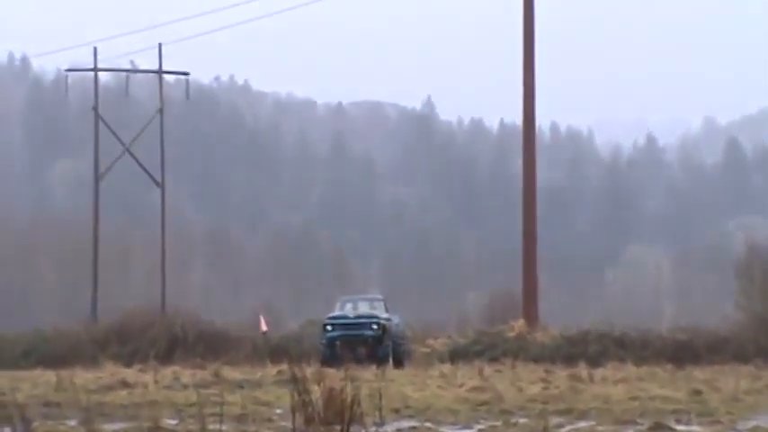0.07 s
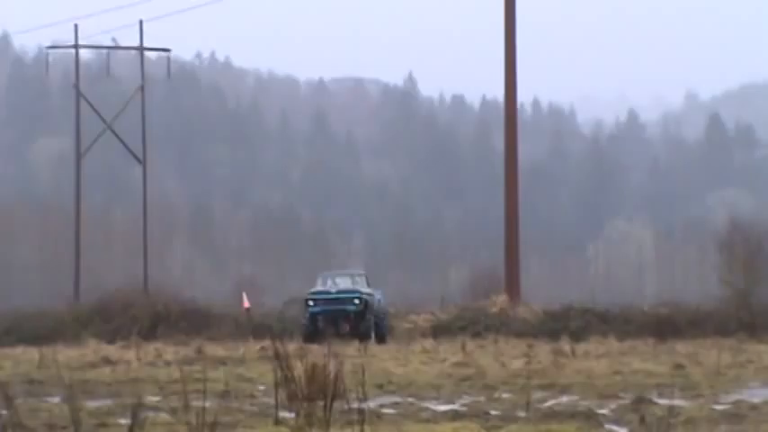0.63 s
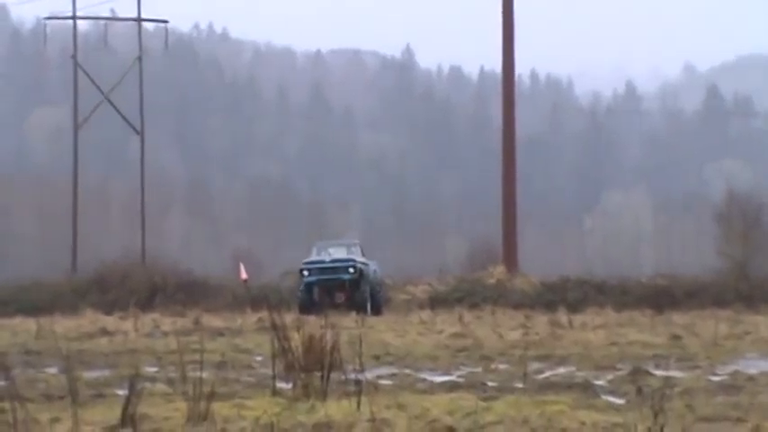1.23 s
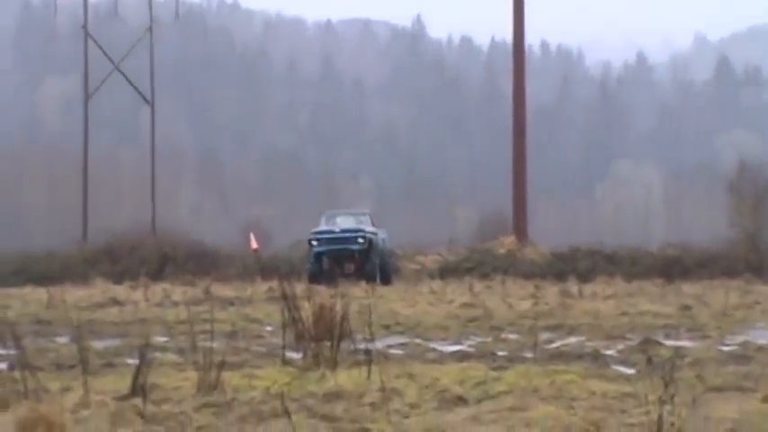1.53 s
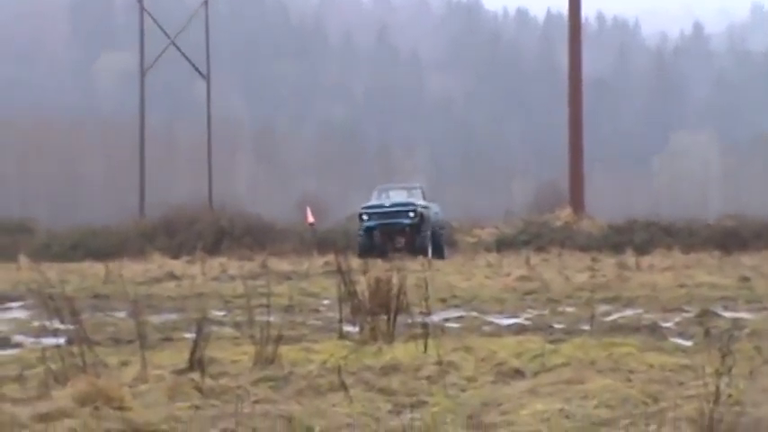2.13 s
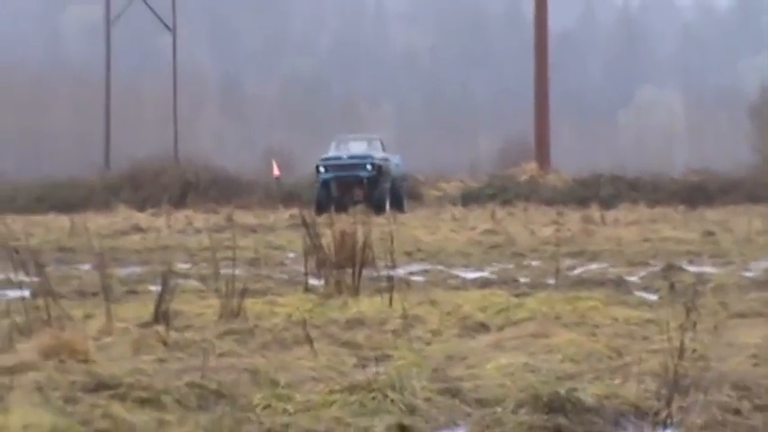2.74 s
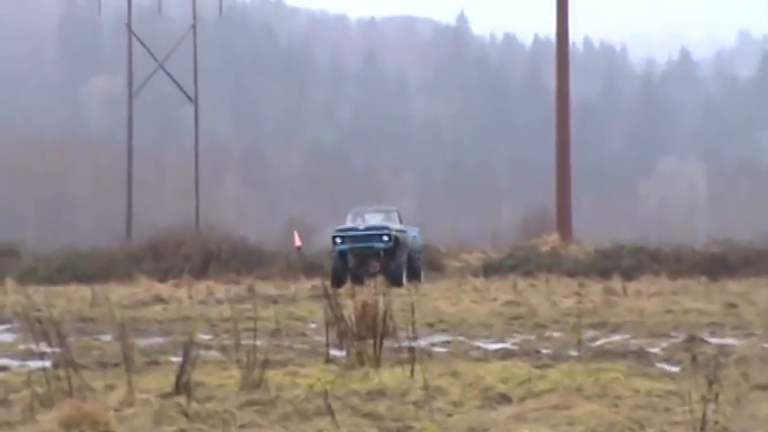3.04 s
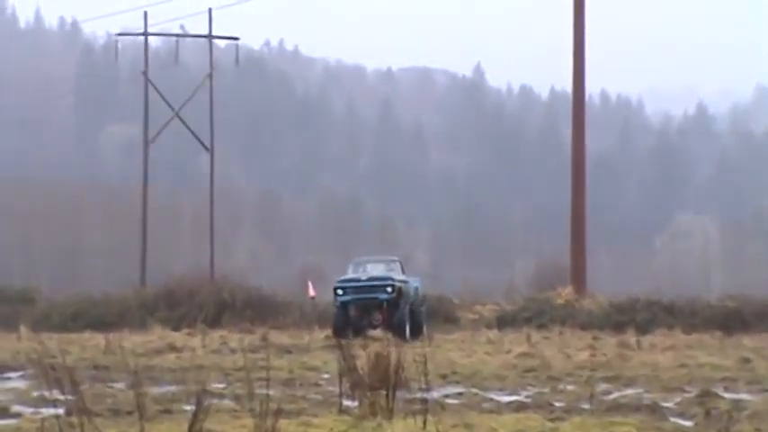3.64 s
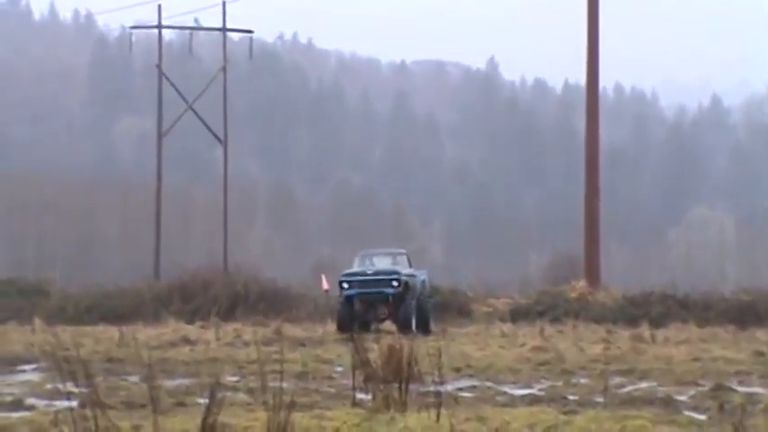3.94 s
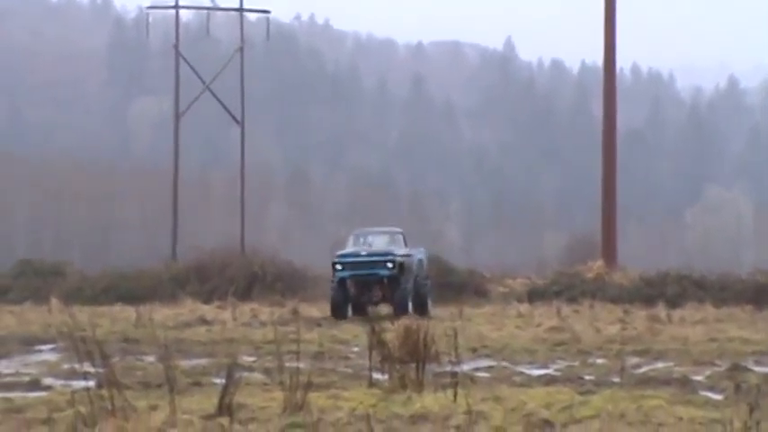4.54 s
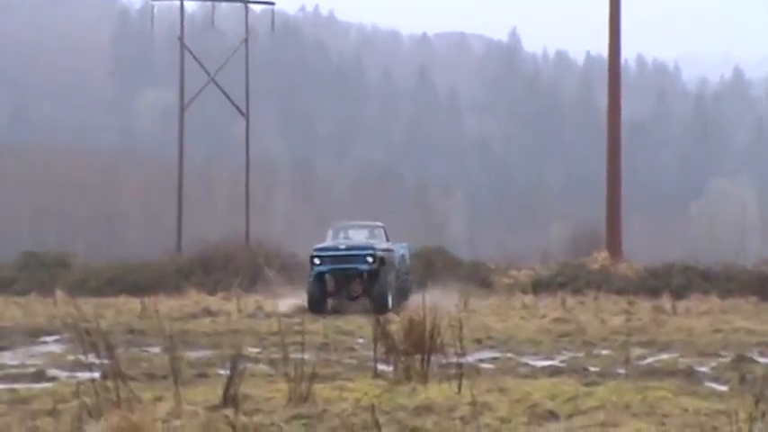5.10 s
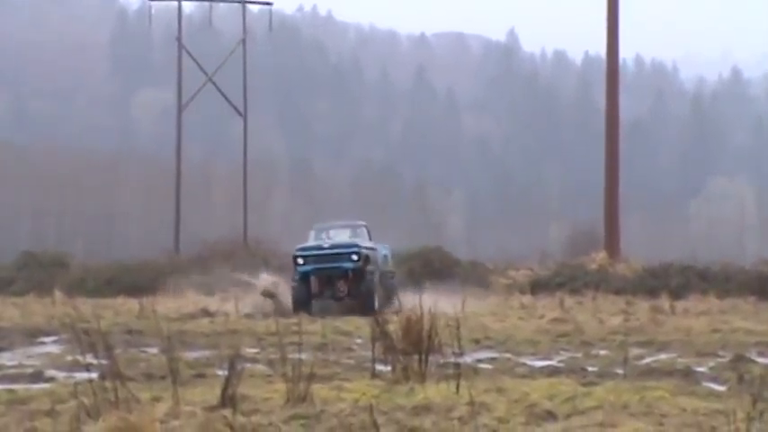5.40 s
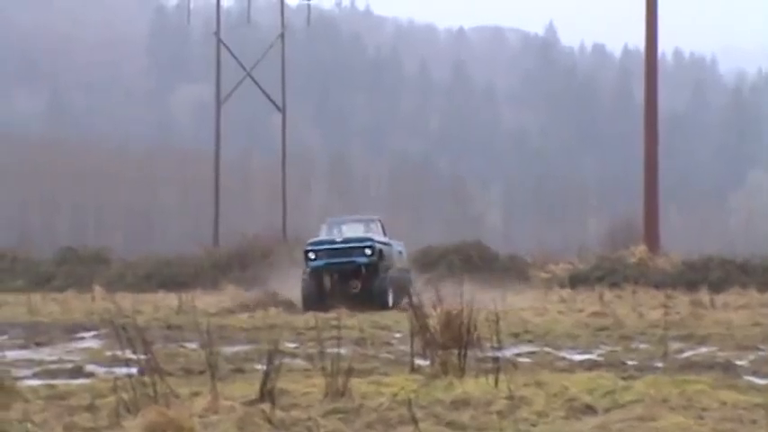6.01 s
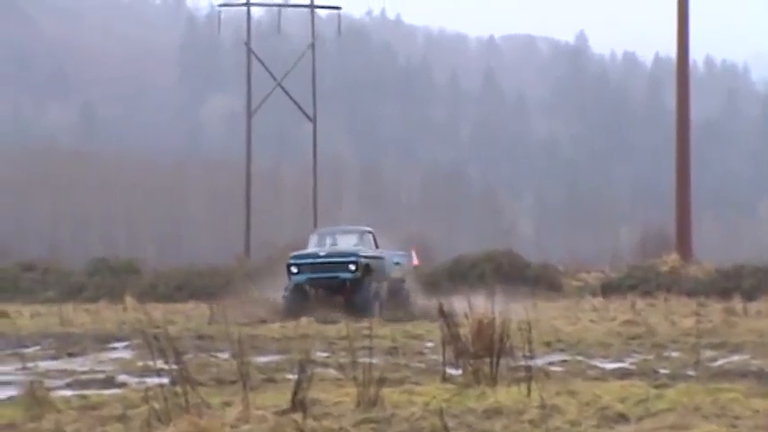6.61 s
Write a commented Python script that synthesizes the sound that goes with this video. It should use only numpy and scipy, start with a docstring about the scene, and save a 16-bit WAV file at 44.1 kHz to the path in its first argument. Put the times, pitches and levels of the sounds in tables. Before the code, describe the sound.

Across a flooded field, with a soft breeze buffeting the microphone, a truck's open exhaust chugs unevenly. Loose steel sings and clanks briefly as it starts moving over wet grass, and a few bright ticks snap close by. Then the revs climb steeply into a louder, ragged roar with a hiss of wheelspin. Sheets of water spray up one after another as the truck draws nearer at full throttle, its tread humming.

```python
"""A V8 mud truck idles far off across a flooded field, its open exhaust loping, while a light wind
stirs on the microphone. After a second it rolls off through wet grass: loose steel sings and clanks,
and a few bright ticks snap. Then it revs up, the exhaust booming and rasping under load as the spinning
tyres scrub the turf. From about four seconds it charges through standing water, throwing up sheets of
spray, and the hum of the tread climbs as the engine is held flat out."""
import sys
import numpy as np
from scipy import signal
from scipy.fft import rfft, irfft, next_fast_len
from scipy.io import wavfile
from scipy.ndimage import uniform_filter1d, map_coordinates

SR = 44100
rng = np.random.default_rng(int(sys.argv[2]) if len(sys.argv) > 2 else 0)


def persist_wave(psi):
    """Save psi, clipped to +-1, as 16-bit WAV."""
    counts = np.round(np.clip(psi, -1, 1) * 32767).astype(np.int16)
    wavfile.write(sys.argv[1], SR, np.atleast_2d(counts).T)


N = 298116

# How hard the engine pulls. Each row: time in seconds, load from 0 to 1.
ENGINE_LOAD = [(0, 0), (2.2, 0.2), (2.8, 0.96), (6.76, 0.86)]


def amp(db):
    """Decibels to gain."""
    return 10 ** (np.asarray(db) / 20)


def unit(x):
    """Scale to rms 1."""
    return x / np.sqrt(np.mean(x ** 2) + 1e-20)


def along(points, hz):
    """Read (Hz, value) points on a log frequency axis."""
    freqs, values = np.transpose(points)
    return np.interp(np.log(hz + 1), np.log(freqs + 1), values)


def curves(rows):
    """Automation: one value per sample for each column after the time."""
    times, *columns = np.transpose(rows)
    return [np.interp(np.arange(N) / SR, times, column) for column in columns]


def wobble(rate):
    """A smooth random curve, rate knots a second."""
    knots = rng.standard_normal(4096)
    coarse = np.arange(0, N + 64, 64)
    return np.interp(np.arange(N), coarse, map_coordinates(knots, [coarse * rate / SR], mode="wrap"))


def filtered(x, response):
    """x through a complex frequency response."""
    size = next_fast_len(N + SR // 2)
    return irfft(rfft(x, size) * response(np.fft.rfftfreq(size, 1 / SR)), size)[..., :N]


def coloured(x, spectrum):
    """x through a (Hz, dB) EQ curve, at rms 1."""
    return unit(filtered(x, lambda hz: amp(along(spectrum, hz))))


def wind():
    """Each microphone port is buffeted on its own, over the faint hiss of open air."""
    # Gusts. Each row: time in seconds, relative level in dB.
    gusts = [(0, -32), (.5, -35.5), (1.1, -30.5), (1.6, -33), (2.3, -31), (2.7, -27), (3.1, -30),
             (3.5, -37.5), (3.95, -30), (4.5, -36), (6.76, -46.5)]
    # Tone of the air and of the buffeting. Each row: frequency in Hz, gain in dB.
    air_eq = [(100, 10), (400, -4.5), (800, 8.5), (1400, -1.5), (3000, -8), (6000, -14), (7500, -21),
              (10500, -27), (15500, -31)]
    rumble_eq = [(10, -21), (25, -4.5), (45, -0.5), (80, 4.0), (150, -43), (400, -34.5), (1500, -84)]
    lumps = amp(1.5 * np.array([wobble(9), wobble(9)]))
    rumble = coloured(lumps * rng.standard_normal((2, N)), rumble_eq)
    hiss = coloured(rng.standard_normal((2, N)), air_eq)
    return amp(curves(gusts)[0] + 3.5) * rumble + amp(-44) * hiss


def crackle():
    """A fine, dry crackle close by: dense tiny grains, partly different at each port."""
    # The crackle's fader. Each row: time in seconds, level in dB.
    fader = [(0, -63.5), (.6, -55.5), (1.0, -60.5), (1.6, -59), (2.05, -71), (2.3, -69), (2.6, -60.5),
             (3.1, -52), (3.4, -71), (6.76, -66)]
    # Its fizzy tone. Each row: frequency in Hz, gain in dB.
    fizz_eq = [(3000, -9), (5200, 3.5), (6000, -7), (7200, -10), (10500, -4), (13000, -7), (15500, -17)]
    grains = rng.standard_normal((3, N)) * amp(3 * wobble(500) + wobble(25))
    return amp(curves(fader)[0]) * coloured(grains[0] + 0.3 * grains[1:], fizz_eq)


def ticks():
    """Small sharp ticks, each a snap of bright band-passed noise."""
    # Each row: start in seconds, relative peak in dB, band centre in Hz.
    cues = [(1.695, -30, 9400), (1.7498, -20, 9200), (1.7584, -43, 7500), (2.2383, -33, 9700),
            (2.2523, -28, 9280), (2.2674, -33, 11000), (2.3136, -30, 10300)]
    out, t = np.zeros(N), np.arange(SR // 20) / SR
    for start, db, hz in cues:
        snap = rng.standard_normal(len(t)) * amp(-60 * t / 0.019) * (1 - np.exp(-t / .0015))
        octaves = np.log2((np.fft.rfftfreq(len(t), 1 / SR) + 1) / hz)
        snap = irfft(rfft(snap) * np.exp(-(octaves / 0.62) ** 2), len(t))
        out[round(start * SR):][:len(t)] += amp(db - 6.5) * snap / np.abs(snap).max()
    return out


def field_reverb(x):
    """The field and tree line answer with a diffuse tail that differs from side to side."""
    # Each row: frequency in Hz, seconds to fall 60 dB.
    decay_times = [(100, 1), (1500, 0.17), (10000, 0.053)]
    hz, t, noise = signal.stft(rng.standard_normal((2, SR // 2)), SR, nperseg=256)
    tail = signal.istft(noise * amp(-60 * t / along(decay_times, hz)[:, None]), SR, nperseg=256)[1]
    return signal.fftconvolve(x[None], tail / np.linalg.norm(tail[0]), axes=1)[:, :N]


def panned(x):
    """The two ports hear the truck at different levels and phases."""
    # Each row: frequency in Hz, left minus right in dB.
    balance = [(60, 6.5), (110, 3.5), (200, 7.5), (380, 1), (700, -2.5), (1290, -6), (2380, -1.5),
               (4400, 0.5), (15000, 1)]
    # Each row: frequency in Hz, phase lead of the left in radians.
    lead = [(60, -1.14), (200, -0.39), (340, -1.06), (700, -0.65), (1500, -0.15), (3500, 0.4), (6000, 0.31)]

    def ports(hz):
        side = np.array([[1], [-1]])
        pair = amp(along(balance, hz) * side / 2) * np.exp(.5j * side * along(lead, hz))
        return pair / np.abs(pair.mean(axis=0))
    return filtered(x, ports)


def chassis(squeal_hz, width_hz):
    """Loose steel sings and clanks as the truck rolls off over the ruts."""
    # The thin metallic singing. Each row: time in seconds, level in dB.
    squeal_fader = [(1.0, -75), (1.25, -43.5), (1.48, -36.5), (1.56, -40), (1.67, -40.5), (1.85, -42.5),
                    (2.2, -70)]
    # Each row: start in seconds, relative level in dB.
    clanks = [(1.48, -28.5), (2.088, -19), (2.309, -33)]
    # The ring of the steel. Each row: frequency in Hz, gain in dB, seconds to fall 60 dB.
    modes = [(2210, -14, .08), (2420, 2, 0.043), (2800, -7, .1), (3630, -8, 0.067), (3970, -8, 0.054),
             (5840, -4, 0.017)]

    def resonances(hz):
        return sum(amp(db) / (1 + ((hz - squeal_hz * ratio) / width_hz) ** 2)
                   for ratio, db in [(.73, -5), (1, 2), (1.19, -12)])
    squeal = unit(filtered(rng.standard_normal(N), resonances))
    out = amp(curves(squeal_fader)[0] + 1.8 * wobble(35)) * squeal
    t = np.arange(SR // 4) / SR
    for start, db in clanks:
        ring = sum(amp(level + rng.normal(0, 1.2) - 60 * t / t60) * np.sin(2 * np.pi * hz * t)
                   for hz, level, t60 in modes)
        out[round(start * SR):][:len(t)] += amp(db) * ring * (1 - np.exp(-t / 0.0003))
    return out


def tyres():
    """Tread blocks slap the ground in a rising hum; wheelspin adds a scrubbing hiss."""
    # The hum. Each row: time in seconds, pitch in Hz, level in dB.
    tread = [(0, 49.9, -94), (5.2, 58.04, -49), (5.5, 67.5, -30.5), (5.9, 81.2, -36.5), (6.3, 86.8, -36),
             (6.76, 103.2, -32)]
    # Wheelspin on turf, up to the water's edge. Each row: time in seconds, level in dB.
    scrub_fader = [(2.8, -54), (3.1, -44), (3.42, -39), (4.0, -33.5), (4.11, -55)]
    # Its tone. Each row: frequency in Hz, gain in dB.
    scrub_eq = [(2000, -46), (2800, 9.5), (3400, 11.5), (3900, -14), (4600, -28), (7000, -59)]
    hz, db = curves(tread)
    hum = amp(db + 0.78 * wobble(13)) * unit(np.sin(2 * np.pi * np.cumsum(hz) / SR))
    scrub = amp(curves(scrub_fader)[0] + wobble(24.86)) * coloured(rng.standard_normal(N), scrub_eq)
    return hum + scrub


def spray(fall_s):
    """Tyres swish through wet grass, then throw sheets of water that rise, hold and fall as drops."""
    # Wet grass. Each row: time in seconds, relative level in dB.
    grass_fader = [(0.0, -57), (0.15, -52.5), (0.74, -56), (1.2, -50.5), (1.57, -44), (1.87, -43),
                   (2.02, -39.5), (2.66, -46), (3.34, -45.5), (4.0, -40), (4.12, -43.5)]
    # One sheet per puddle. Each row: start, attack and length in seconds, level in dB.
    puddles = [(4.148, 0.18, 0.45, -31), (4.523, 0.075, 0.13, -29), (4.908, 0.047, 0.092, -29),
               (5.105, 0.063, 0.37, -27), (5.54, .06, 0.32, -28.5), (5.853, 0.074, 0.33, -27),
               (6.36, 0.055, .4, -31.5)]
    # Tone of the water under load and at idle. Each row: frequency in Hz, gain in dB.
    spray_eq = [(1650, -18.5), (2800, 2), (3300, 0.5), (3620, 2), (3980, 3), (4760, -8), (5490, -7.5),
                (6710, -13), (7570, -21.5), (10200, -26.5), (13100, -46), (15500, -64)]
    swish_eq = [(1650, -5), (2800, -7.5), (3320, -2), (3620, -7), (3840, 2), (4240, -7.5), (4720, -6.5),
                (5940, -8.5), (7200, -19.5), (9590, -20.5), (15500, -49)]
    t = np.arange(N) / SR
    power = amp(curves(grass_fader)[0] + 5) ** 2
    for start, attack, length, db in puddles:
        release = np.exp(-np.maximum(t - start - length, 0) / fall_s)
        sheet = np.clip((t - start) / attack, 0, 1) * release
        power += (amp(db) * sheet) ** 2
    load, = curves(ENGINE_LOAD)
    drops = unit(rng.standard_normal(N) * amp(1.46 * wobble(350) + 0.52 * wobble(30)))
    water = np.sqrt(load) * coloured(drops, spray_eq) + np.sqrt(1 - load) * coloured(drops, swish_eq)
    return np.sqrt(power) * water


def crank():
    """Four-stroke cycles per second, and cycles turned so far: eight firings each."""
    # Idle, a long climb, a stumble in the water, flat out. Each row: time in seconds, cycles a second.
    revs = [(0.0, 10.7), (0.3, 11.2), (0.79, 12.7), (1.13, 11.9), (1.45, 12.9), (1.81, 10.9), (2.11, 10.6),
            (2.43, 14.1), (2.56, 15.6), (2.79, 15.4), (2.92, 17.6), (3.07, 19.1), (3.22, 20.1),
            (3.41, 24.0), (3.56, 24.7), (3.75, 27.8), (3.9, 28.9), (4.05, 31.6), (4.52, 35.4), (4.67, 38.2),
            (4.86, 36.5), (5.03, 40.2), (5.12, 38.0), (5.31, 42.1), (5.67, 42.2), (5.78, 43.2),
            (6.23, 43.5), (6.76, 41.9)]
    rate, = curves(revs)
    return rate, np.cumsum(rate) / SR


def gas_bursts(scatter_db, decay_s):
    """One turbulent puff per firing, each of another size, held to an even average level."""
    rate, cycles = crank()
    firing, fraction = np.divmod(8 * cycles, 1)
    size = amp(scatter_db * rng.standard_normal(int(firing[-1]) + 1))[firing.astype(int)]
    age_s = fraction / (8 * rate)
    envelope = size * np.exp(-age_s / decay_s)
    running_rms = np.sqrt(np.abs(uniform_filter1d(envelope ** 2, size=SR // 4)) + 1e-9)
    return rng.standard_normal(N) * envelope / running_rms


def snarl(spread_db):
    """A crackle that repeats with every engine cycle, so that its high orders glide with the crank."""
    size, order_count = 8192, 220
    levels, phases = rng.standard_normal((2, order_count))
    loop = irfft(np.r_[0, amp(spread_db * levels) * np.exp(2j * np.pi * phases)], size)
    rate, cycles = crank()
    wave = np.interp(cycles % 1 * size, np.arange(size), loop)
    # as strong per hertz as white noise of rms 1
    return unit(wave) * np.sqrt(order_count * rate / (SR / 2))


def exhaust_rasp(dip_hz, dip_width_hz):
    """The sharp front of each burst barks and rasps: loose at idle, mostly crank-locked under load."""
    # Tone of the midrange bark and the brighter rasp. Each row: frequency in Hz, gain in dB.
    bark_eq = [(250, -35.5), (450, 5), (560, -6), (690, 2.5), (830, -2), (980, 3.5), (1300, 4), (1550, -32),
               (1900, -23), (3000, -65)]
    rasp_eq = [(900, -46), (1400, 0), (1600, 2), (1740, 4.5), (1850, 7), (2020, 2), (2280, 5), (2480, 3.5),
               (2620, 5.5), (2780, -13), (3250, -6), (3900, -15), (6000, -76.5)]
    # The rasp hardens as the truck pulls and nears. Each row: time in seconds, relative level in dB.
    rasp_fader = [(0.0, -47.5), (1.04, -46.5), (1.3, -38.5), (2.45, -31), (2.65, -34.5), (3.37, -31),
                  (4.03, -25.5), (4.09, -30.5), (4.2, -25), (4.56, -26.5), (4.63, -23), (4.93, -23),
                  (5.01, -18), (5.03, -22.5), (5.21, -18.5), (5.31, -21.5), (6.29, -18), (6.76, -18.5)]
    # The ground bounce notches the bark. Each row: time in seconds, depth from 0 to 1.
    ground_dip = [(0, 0), (2.6, 0), (3.3, 0.98), (4.4, 0.35), (5.2, 0), (5.7, 0.32), (6.2, 0.83),
                  (6.76, 0.8)]
    bark_db = -35 + 10.5 * np.log2(crank()[0] / 28.25)  # 10.5 dB up per doubling of the revs
    rasp_db = curves(rasp_fader)[0] - 0.5
    # the snarl's pattern drifts as the truck moves
    drift = np.array([wobble(3.5) for _ in range(5)])
    pattern = sum(weight * snarl(spread_db=4) for weight in drift / np.linalg.norm(drift, axis=0))
    locked = np.interp(curves(ENGINE_LOAD)[0], [0, 1], [.15, .72])
    gas = np.sqrt(locked) * pattern + np.sqrt(1 - locked) * gas_bursts(scatter_db=1.5, decay_s=0.024)
    bark = coloured(gas, bark_eq)
    cancelled = filtered(bark, lambda hz: np.exp(-((hz - dip_hz) / dip_width_hz) ** 2))
    bark -= curves(ground_dip)[0] * cancelled
    flutter_db = .9 * wobble(32)
    return amp(bark_db + .5 * flutter_db) * bark + amp(rasp_db + flutter_db) * coloured(gas, rasp_eq)


def exhaust_boom():
    """Low orders of the crank through the pipe, over the throb of uneven combustion."""
    # The two banks fire unevenly. Each row: multiple of the cycle rate, gain in dB idling and loaded.
    orders = [(2, -2, 6), (3, 9.5, 12), (4, -1, 8), (6, 8, 5.5), (7, 5.5, 8), (9, -6, 11), (10, 10, 7),
              (11, 11, 1.5), (12, -23, -0.5), (13, 11, 2.5), (14, 10, -.5), (15, -11, -2), (16, 8, 1),
              (17, 5, -3.5), (18, 1, -3), (19, -16, -20), (20, -24, -22), (21, 0, -21), (22, -8.5, -13.5)]
    # Tone of the pipe and of the throb. Each row: frequency in Hz, gain in dB.
    pipe_eq = [(30, -30), (70, -16.5), (100, -12), (128, -11), (170, -3.5), (215, 0), (280, -10.5),
               (340, -5.5), (430, -8), (520, -27), (700, -22), (1000, -22)]
    throb_eq = [(20, -33), (60, -25), (120, -15), (180, 1), (260, -1.5), (360, -15), (500, -26),
                (800, -24.5), (1500, -57)]
    # Burble and throb ride the revs. Each row: cycles a second, relative level in dB.
    level_by_revs = [(11, -23), (13, -22), (16, -19), (22, -19.5), (29, -23.5), (35, -22.5), (38.5, -19.5),
                     (42, -23.5)]
    # Two strong notes swell through the exhaust's resonances. Each row: pitch in Hz, level in dB.
    firing_swell = [(90, -32.5), (121, -31), (133, -18.5), (160, -14), (193, -12.5), (233, -13.8),
                    (245, -21), (258, -23.5), (267, -17.5), (287, -16), (303, -20), (334, -22),
                    (348, -30.5)]
    drone_swell = [(55, -35.5), (75, -40.5), (118, -42), (145, -26.5), (155, -21.5), (182, -24),
                   (192, -33.5), (206, -15.5), (220, -19.5)]
    rate, cycles = crank()
    cycles += .008 * wobble(7)  # the crank runs ahead and behind as the tyres grip and slip
    load, = curves(ENGINE_LOAD)

    def partial(order, rough, flutter_hz):
        # even orders add up to two chugs a cycle; the pipe spreads each chug in time
        phase = order * cycles + order % 2 / 4 + (.012 + .02 * load) * (order - 16) ** 2
        jitter = wobble(flutter_hz) + 1j * wobble(flutter_hz)
        flutter = (1 + rough * jitter) / np.sqrt(1 + 2 * rough ** 2)
        return np.sqrt(2) * np.real(flutter * np.exp(2j * np.pi * phase))

    ragged = .17 + .4 * load  # combustion is steady at idle, ragged at full throttle
    burble, power = np.zeros(N), np.zeros(N)
    for order, idle_db, load_db in orders:
        gain = amp(idle_db + load * (load_db - idle_db) + along(pipe_eq, order * rate))
        burble += gain * partial(order, rough=ragged, flutter_hz=22)
        power += gain ** 2
    burble *= amp(-0.88 - 0.56 * load) / np.sqrt(power)
    throb = amp(-10 + 3.7 * load) * coloured(gas_bursts(scatter_db=1, decay_s=0.0036), throb_eq)
    uneven = amp(along(level_by_revs, rate) + .6 * (load - 0.5)) * (burble + throb)
    strain = np.interp(rate, [35, 42], [.07, .55])  # the firing note roughens near top revs
    firing = amp(along(firing_swell, 8 * rate)) * partial(8, rough=strain, flutter_hz=20)
    drone = amp(along(drone_swell, 5 * rate)) * partial(5, rough=0.023, flutter_hz=21)
    # at idle the two banks leave a lull between their chugs
    lope = 1 + .22 * (1 - load) * np.cos(4 * np.pi * cycles)
    return lope * (uneven + firing + drone)


def scene():
    """The truck in the open field, with ticks, crackle and wind left dry."""
    engine = exhaust_boom() + exhaust_rasp(dip_hz=663, dip_width_hz=294)
    truck = engine + spray(fall_s=0.25) + tyres() + chassis(squeal_hz=3275, width_hz=150)
    return panned(truck) + amp(-19.5) * field_reverb(truck) + ticks() + crackle() + wind()


def record(dry):
    """A brick-wall low-pass trims the very top."""
    return filtered(dry, lambda hz: hz < 15750)


dry = scene()
out = record(dry)
persist_wave(out)
```